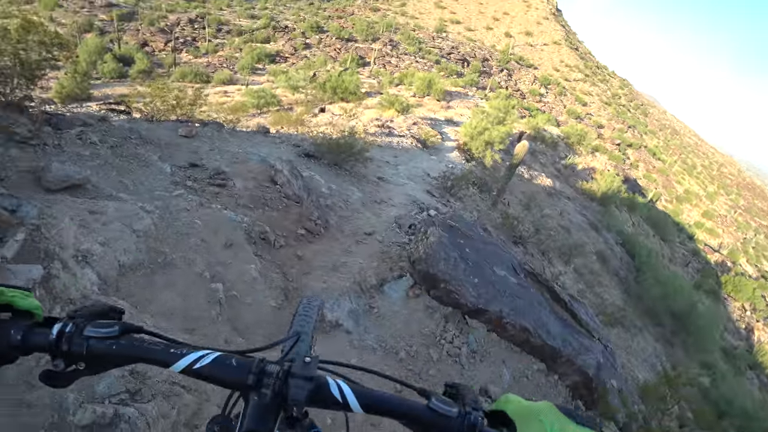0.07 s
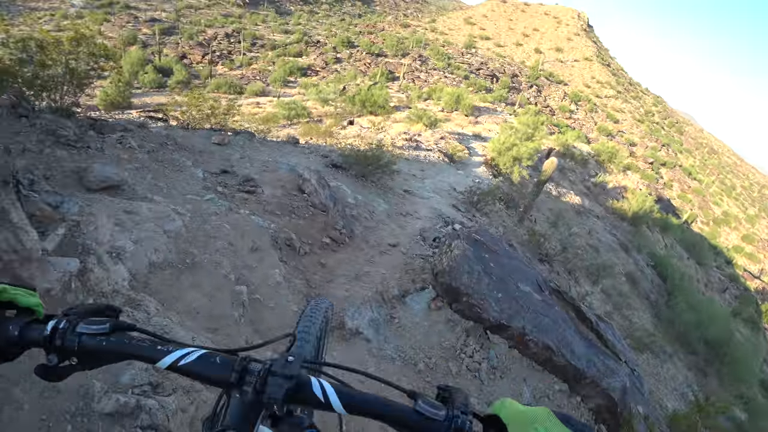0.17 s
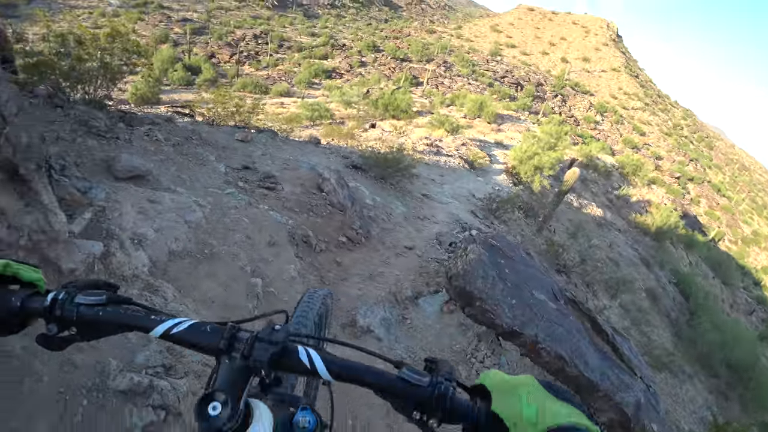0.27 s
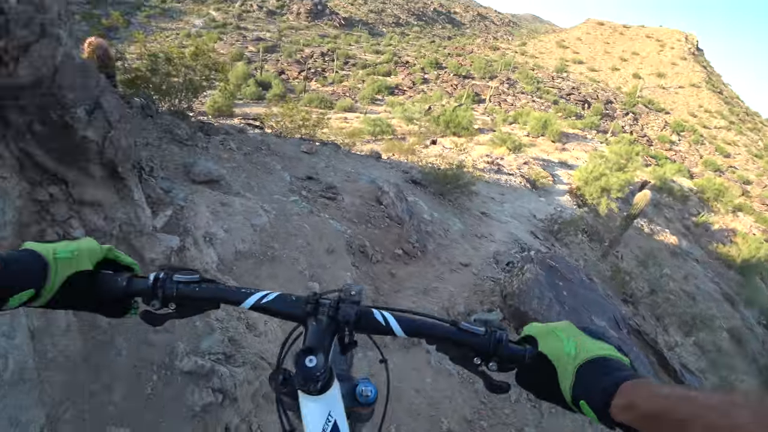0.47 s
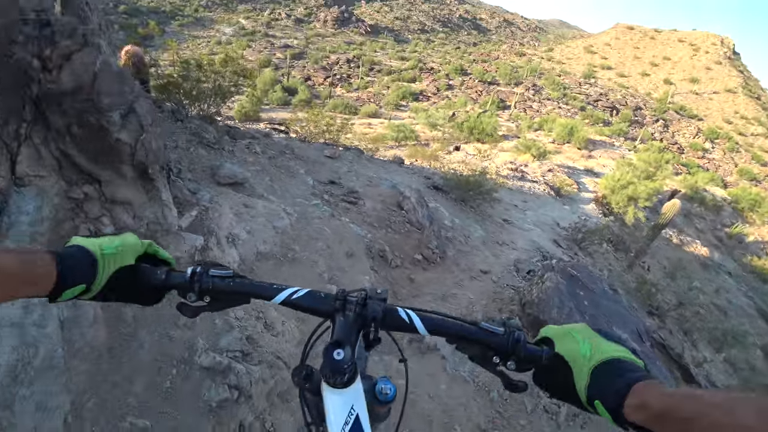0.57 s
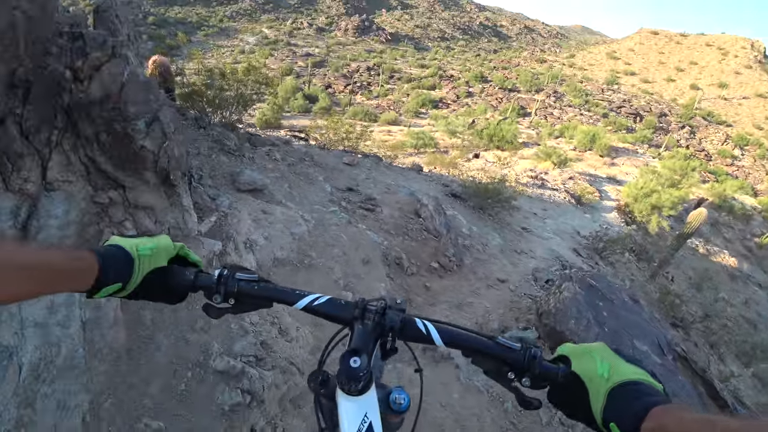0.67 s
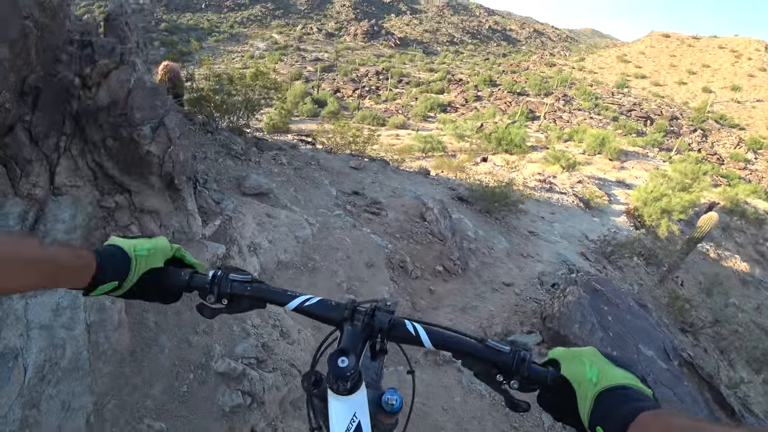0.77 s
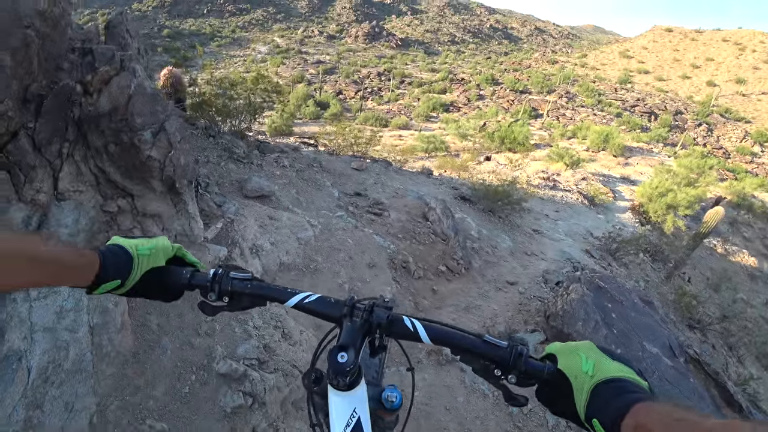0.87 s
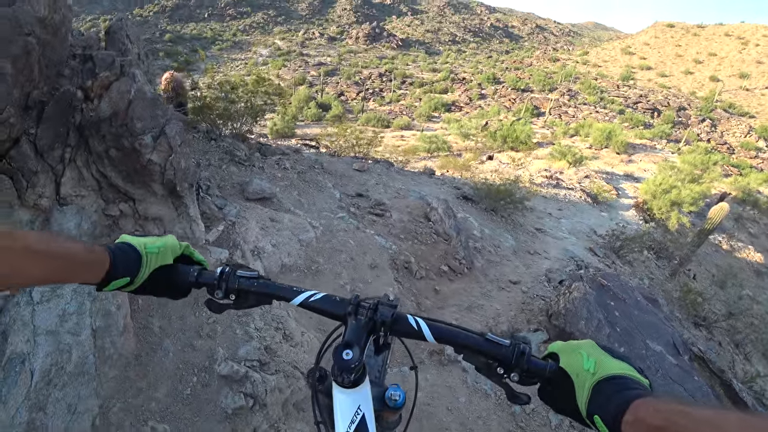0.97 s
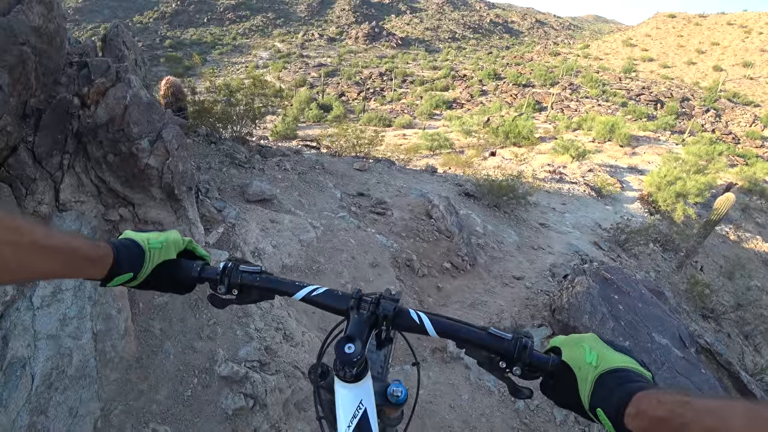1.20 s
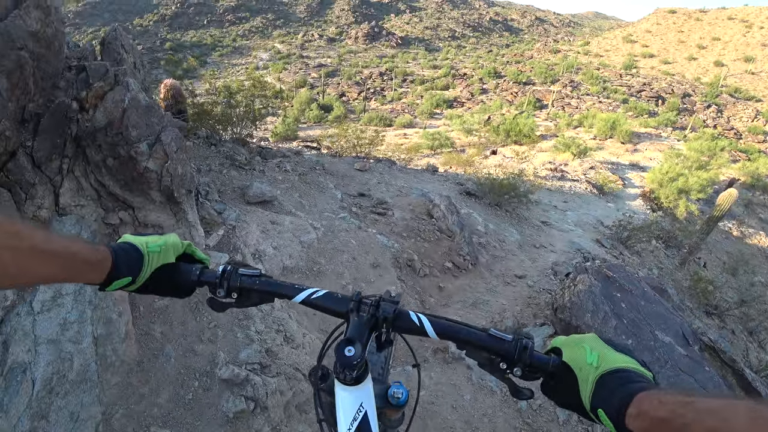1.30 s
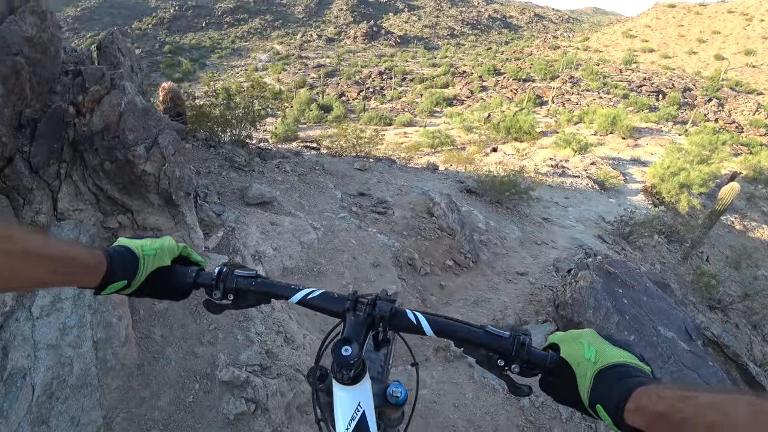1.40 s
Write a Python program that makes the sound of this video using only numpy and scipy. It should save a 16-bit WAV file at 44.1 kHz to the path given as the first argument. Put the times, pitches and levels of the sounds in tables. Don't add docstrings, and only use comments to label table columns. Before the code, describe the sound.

A mountain bike lands and rattles down rock, then its freehub clicks slower while coasting

```python
import sys
import numpy as np
from scipy import signal
from scipy.fft import rfft, irfft, next_fast_len
from scipy.io import wavfile
from scipy.ndimage import map_coordinates

SR = 44100
rng = np.random.default_rng(int(sys.argv[2]) if len(sys.argv) > 2 else 0)


def gain_from_db(level_db):
    decades = np.asarray(level_db, float) / 20
    return 10 ** decades


def pcm_store(signal):
    levels = np.round(np.clip(np.atleast_2d(signal), -1, 1) * 32767)
    wavfile.write(sys.argv[1], SR, levels.astype(np.int16).T)


N = 63945
BLOW_TIME = np.arange(SR // 8) / SR

# (frequency [Hz], level [dB])
CRACK_COLOUR = [(880, -54), (1500, 12.5), (2120, 4.5), (4000, 5.5), (5540, 1.5), (8570, -1.5),
                (12100, -10.5), (16000, -43)]


def unit(x):
    return x / np.sqrt(np.mean(x ** 2) + 1e-20)


def along(points, hz):
    f, v = np.transpose(points)
    return np.interp(np.log(hz + 1), np.log(f + 1), v)


def curves(rows):
    s, *columns = np.transpose(rows)
    return [np.interp(np.arange(N) / SR, s, column) for column in columns]


def wobble(rate):
    return map_coordinates(rng.standard_normal(200), [np.arange(N) * rate / SR])


def filtered(x, response):
    m = next_fast_len(N + 8192)
    return irfft(rfft(x, m) * response(np.fft.rfftfreq(m, 1 / SR)), m)[..., :N]


def noise(spectrum, envelope=1):
    def colour(hz):
        return gain_from_db(along(spectrum, hz))

    scale = np.sqrt(np.mean(colour(np.fft.rfftfreq(8192, 1 / SR)) ** 2))
    return filtered(envelope * rng.standard_normal((2, N)), colour) / scale


def stereo(pair, alike=None):
    # (frequency [Hz], likeness [0-1])
    port_likeness = [(60, 0.85), (180, 0.96), (550, 0.88), (1650, 0.66), (4970, 0.95), (15000, 0.83)]
    points = port_likeness if alike is None else alike

    def turn(hz):
        angle = np.arccos(np.clip(along(points, hz), 0, 1)) / 2
        return np.array([np.cos(angle), np.sin(angle)])

    mid, side = filtered(pair, turn)
    return np.array([mid + side, mid - side])


def add(track, s, sound):
    part = track[..., max(round(s * SR), 0):][..., :sound.shape[-1]]
    part += sound[..., :part.shape[-1]]


def dying(t60, attack=.0002):
    return gain_from_db(-60 * BLOW_TIME / t60) * (1 - np.exp(-BLOW_TIME / attack))


def struck(events, t60, boost_db, overtone):
    out = np.zeros(N)
    for s, db, hz in events:
        upper, lower = overtone + 0.091 * rng.standard_normal(), 0.71 + 0.11 * rng.standard_normal()
        phase = 2 * np.pi * hz * BLOW_TIME
        modes = np.sin(phase) + 0.32 * np.sin(upper * phase) + 0.18 * np.sin(lower * phase)
        add(out, s, gain_from_db(db + boost_db - 5.5) * dying(t60, 0.14 / hz) * modes)
    return out


def puffs(events, shape, spectrum):
    envelope = np.zeros(N)
    for s, db, *_ in events:
        add(envelope, s, gain_from_db(db) * shape)
    return stereo(noise(spectrum, envelope))


def push(s, db, ms):
    u = (np.arange(N) / SR - s) / (ms / 1000)
    return gain_from_db(db) * (1 - u * u / 2) * np.exp(-u * u / 2)


def freehub():
    # (time [s], peak level [dB], spread of the pawls [ms])
    clicks = [(0.6763, -18.5, 9.9), (0.709, -20, 11), (0.7383, -20, 11.3), (0.7731, -20.5, 12.2),
              (0.8093, -22.5, 12.6), (0.8445, -25.5, 7.6), (0.8813, -25, 10.9), (0.919, -27.5, 11),
              (0.959, -24, 11.5), (1.0023, -28.5, 10.4), (1.044, -27, 12), (1.09, -28.5, 7.7),
              (1.1363, -28, 11.6), (1.188, -28.5, 11), (1.2421, -27, 9.8), (1.289, -29.5, 12.1),
              (1.3375, -45, 7.8), (1.361, -48.5, 11), (1.399, -48.5, 13.5)]
    # (frequency [Hz], level [dB])
    scrape_colour = [(900, -50), (1400, -6.5), (3080, -0.5), (5520, -3.5), (6390, -4), (8360, -8),
                     (10800, -2), (12500, -12.5), (16000, -17.5)]
    # (frequency [Hz], level [dB], t60 [s])
    shell_modes = [(1720, 3, .1), (2370, 0, .05), (2870, -1, .022), (3280, 0, .022), (3900, -1, .022),
                   (4500, -1, .022), (5050, -1, .022), (5600, -3, .022), (6270, -9, .12), (7300, -6, .022),
                   (8800, -6, .022), (10100, -6, .022), (10930, -6, .03)]
    click_db, tail_db, shell_db = -4.5, -3.5, -12.5
    pawl_t60, tail_t60 = .009, 0.045
    pawl_scatter_db, swell_db = 2.5, 9
    mode_scatter_db, mode_scatter = 5, .03
    closing = 15

    envelope, ring = np.zeros(N), np.zeros(N)
    for k, (s, db, ms) in enumerate(clicks):
        spread = ms / 1000
        if k == closing:
            s, spread = 1.2915, .2 * spread
        modes = np.zeros(len(BLOW_TIME))
        for hz, mode_db, t60 in shell_modes:
            louder, higher = np.tanh(rng.standard_normal(2))
            tone = np.sin(2 * np.pi * hz * BLOW_TIME * (1 + mode_scatter * higher))
            modes += gain_from_db(mode_db + mode_scatter_db * louder) * dying(t60) * tone
        add(envelope, s, gain_from_db(db + click_db + tail_db) * dying(tail_t60, 0.0062))
        for j in range(6):
            at = s + spread * ((j + rng.random()) / 6 - .15)
            swell = swell_db * (np.sin(np.pi * (j + 1.4) / 6) - 1.5)
            gain = gain_from_db(db + click_db + pawl_scatter_db * rng.standard_normal() + swell)
            add(envelope, at, gain * dying(pawl_t60))
            add(ring, at, gain * gain_from_db(shell_db) * modes)
    return stereo(noise(scrape_colour, envelope)) + ring


def boom():
    # (time [s], pitch [Hz], level [dB])
    carcass = [
        (0.2, 165, -60),
        (0.21, 164, -41),
        (0.23, 150, -24.5),
        (0.252, 136.9, -25),
        (0.29, 138.5, -29),
        (0.326, 119, -33),
        (0.36, 90, -53),
    ]
    # (pitch ratio, level [dB])
    drum_modes = [(1, 6.5), (1.4, 0), (2, 0), (2.38, -2), (3.1, -18), (4.2, -18)]
    landing_s, rough_db, drift = .2468, 1.5, .25
    hz, db = curves(carcass)
    s = np.arange(N) / SR
    gate = np.clip((s - carcass[0][0]) / 0.012, 0, 1) * np.clip((carcass[-1][0] - s) / 0.0072, 0, 1)
    turns = 2 * np.pi * (np.cumsum(hz) - hz[:round(landing_s * SR)].sum()) / SR
    drum = np.zeros(N)
    for ratio, mode_db in drum_modes:
        drum += gain_from_db(mode_db + rough_db * wobble(47)) * np.cos(ratio * turns + drift * wobble(31.0))
    return gate * gain_from_db(db - 4.0) * drum


def knocks():
    # (time [s], peak level [dB], ring [Hz])
    tyre_knocks = [(.212, -15, 324), (.218, -18, 427), (.226, -23.5, 192), (.26, -15, 273), (.35, -26, 447),
                   (.476, -29.5, 500), (.622, -18, 378), (.627, -16.5, 300), (.632, -31, 162),
                   (.638, -43, 412), (.66, -18.5, 465), (.671, -30, 440), (.676, -19, 167),
                   (.686, -38, 415), (.734, -29, 300), (1.169, -39, 418), (1.257, -24, 379),
                   (1.337, -27.5, 373)]
    # (frequency [Hz], level [dB])
    thud_colour = [(60, -43), (170, -0.5), (350, 2.5), (700, -3), (1500, -41), (4000, -87)]
    s = np.arange(N) / SR - .512
    jolt = gain_from_db(-34) * np.exp(-(s / 0.019) ** 2 / 2) * np.sin(2 * np.pi * 52 * s)
    thud = puffs(tyre_knocks, gain_from_db(-13.5) * dying(0.1, 0.00074), thud_colour).mean(0)
    ring = struck(tyre_knocks, t60=0.048, boost_db=-3.5, overtone=1.456)
    return ring + thud + push(.2468, db=-15, ms=0.99) + jolt


def stones():
    # (time [s], peak level [dB], ring [Hz])
    stone_hits = [(0.159, -28, 1050), (0.2053, -21, 1065), (0.214, -23.5, 1124), (0.2825, -28, 2060),
                  (0.295, -31.5, 2170), (0.306, -38, 2160), (0.318, -34, 2090), (0.3508, -18.5, 1500),
                  (0.3535, -25, 1850), (0.415, -23.5, 1815), (0.4763, -29.5, 2150), (0.5312, -26, 2310),
                  (0.577, -35, 1970), (0.589, -27, 1850), (0.606, -27.5, 2000), (0.616, -22, 1810),
                  (0.646, -45, 1950), (0.6605, -19.5, 1185), (0.6683, -23.5, 2300), (1.3386, -43, 1590),
                  (1.398, -44.5, 1690)]
    # (time [s], peak level [dB])
    hard_snaps = [
        (.2165, -30),
        (.351, -18),
        (.4153, -26),
        (.5315, -19),
        (.6165, -25),
        (.6685, -23),
    ]
    snaps = sum(push(s, db, ms=0.053) for s, db in hard_snaps)
    ring = struck(stone_hits, t60=.02, boost_db=3.5, overtone=0.854)
    return ring + puffs(stone_hits, gain_from_db(-18) * dying(0.017), CRACK_COLOUR) + snaps


def ticks():
    # (time [s], peak level [dB], ring [Hz])
    cable_ticks = [(0.0345, -33.5, 3450), (0.0475, -34.5, 7900), (0.0565, -27.5, 2470),
                   (0.081, -28.5, 5660), (0.084, -38, 10200), (0.1095, -36, 1810), (0.1212, -26, 3440),
                   (0.1405, -23.5, 3800), (0.1537, -22, 3700), (0.168, -21, 3600), (0.185, -47, 5500),
                   (0.207, -26, 2120), (0.2155, -18.5, 2170), (0.2455, -19.5, 3470), (0.247, -23, 2170),
                   (0.251, -23, 5740), (0.3308, -24, 4020), (0.3315, -26, 2100), (0.339, -28, 3440),
                   (0.3508, -20, 4200), (0.3875, -26, 3400), (0.415, -27.5, 4020), (0.4419, -25.5, 4500),
                   (0.4647, -23.5, 4340), (0.5142, -22.5, 2300), (0.5307, -22.5, 2620), (0.5557, -34, 3620),
                   (0.5865, -22.5, 4720), (0.5895, -33, 4830), (0.597, -26, 4060), (0.601, -36, 4700),
                   (0.608, -21, 4940), (0.6164, -15, 4360), (0.621, -28, 4500), (0.632, -25, 4200),
                   (0.6683, -19.5, 4180), (0.679, -34, 4370), (0.683, -22, 4940), (1.4474, -38, 5100)]
    # (time [s], peak level [dB])
    wire_clicks = [
        (.1212, -20.5),
        (.1403, -17),
        (.1535, -26),
        (.168, -20),
        (.3305, -21.5),
        (.4635, -25),
        (.5555, -29),
        (.6685, -34),
        (1.2915, -20),
    ]
    # (frequency [Hz], level [dB])
    wire_colour = [(1000, -60), (2500, -16), (3800, 6), (5500, -5), (8000, 8.5), (12000, -1), (16000, -18)]
    crack = gain_from_db(-9) * (dying(.009) + 0.044 * dying(0.037))
    wire = puffs(wire_clicks, gain_from_db(-10) * dying(.007), wire_colour)
    ring = struck(cable_ticks, t60=.009, boost_db=-1, overtone=2.0)
    return puffs(cable_ticks, crack, CRACK_COLOUR) + ring + wire


def grit():
    # (time [s], level [dB])
    tread_load = [(0, -52), (.035, -43), (.09, -44), (.17, -46), (.2, -43), (.21, -32.5), (.245, -32),
                  (.285, -40), (.32, -42.5), (.36, -35), (.41, -44.5), (.47, -41), (.55, -43.5),
                  (.6, -36.5), (.65, -40.5), (.69, -40), (.75, -45.5), (1.15, -50), (1.172, -45),
                  (1.19, -48.5), (1.23, -56), (1.45, -58.5)]
    # (frequency [Hz], level [dB])
    crunch_colour = [(88, -13), (150, -15.5), (328, -14.5), (960, -19.5), (1100, -16.5), (1360, -24),
                     (2140, -22), (3500, -26), (6510, -30.5), (16000, -44.5)]
    grains_per_s, grain_db, grain_spread_db, grain_cap = 1500, -5, 6, 3.1
    tube_hz, tube_width_hz, tube_lift = 1845, 270, 0.71

    def tread(hz):
        tube = 1 + tube_lift / (1 + ((hz - tube_hz) / tube_width_hz) ** 2)
        return gain_from_db(along(crunch_colour, hz)) * tube

    load_db, = curves(tread_load)
    size = np.minimum(rng.exponential(1, N), 0.73 * grain_cap)
    spikes = (rng.random(N) < grains_per_s / SR) * gain_from_db(grain_spread_db * size)
    grains = np.convolve(spikes, dying(0.0077)[:400])[:N]
    hiss = gain_from_db(1.93 * wobble(36.05) + 3.2 * wobble(89.62))
    rough = rng.standard_normal((2, N)) * (hiss + gain_from_db(grain_db) * unit(grains))
    shaped = filtered(rough, tread)
    band = filtered(shaped, lambda hz: (hz > 1000) & (hz < 9000))
    return gain_from_db(load_db - 3) * stereo(shaped / np.std(band))


def wind():
    # (time [s], level [dB])
    gusts = [(0.0, -44), (0.076, -38.5), (0.108, -56), (0.156, -35.5), (0.204, -43), (0.242, -36.5),
             (0.46, -41), (0.516, -37), (0.548, -44.5), (1.21, -46.5), (1.256, -54.5), (1.412, -49.5),
             (1.45, -63)]
    # (frequency [Hz], level [dB])
    rumble_colour = [(12, -32), (20, -5.5), (54, 7.5), (80, 0.5), (124, -3.5), (178, -12), (300, -21),
                     (390, -57), (660, -120)]
    hum_hz, hum_width_hz = 129.3, 10.8
    hum_db, hum_fall_db_per_s = -49, 7
    level_db, = curves(gusts)
    hum = filtered(rng.standard_normal(N), lambda hz: 1 / (1 + ((hz - hum_hz) / hum_width_hz) ** 2))
    buffet = gain_from_db(level_db - 4 + 2.0 * wobble(13.0)) * stereo(noise(rumble_colour), [(50, 0.93)])
    return buffet + gain_from_db(hum_db - hum_fall_db_per_s * np.arange(N) / SR) * unit(hum)


def rocks(x):
    length = len(BLOW_TIME)
    scatter = rng.standard_normal((2, length)) * dying(0.026, 0.01)
    padded = np.pad(scatter, ((0, 0), (0, N - length)))
    tail = filtered(padded, lambda hz: hz / (hz + 900))[:, :length]
    return signal.fftconvolve(x.mean(0)[None], tail / np.linalg.norm(tail[0]), axes=1)[:, :N]


def scene():
    wheel = freehub() + stones() + knocks() + boom()
    near = ticks()
    answer = gain_from_db(-7.5) * rocks(wheel + 0.89 * near)
    balance = gain_from_db([[0.26], [-0.26]])
    return (wheel + near + answer + grit() + wind()) * balance


def band_limit(x):
    return signal.sosfilt(signal.butter(12, 16830, fs=SR, output="sos"), x)


def record(dry):
    mix = filtered(dry, lambda hz: hz < 15900)
    return band_limit(mix)


dry = scene()
out = record(dry)
pcm_store(out)
```